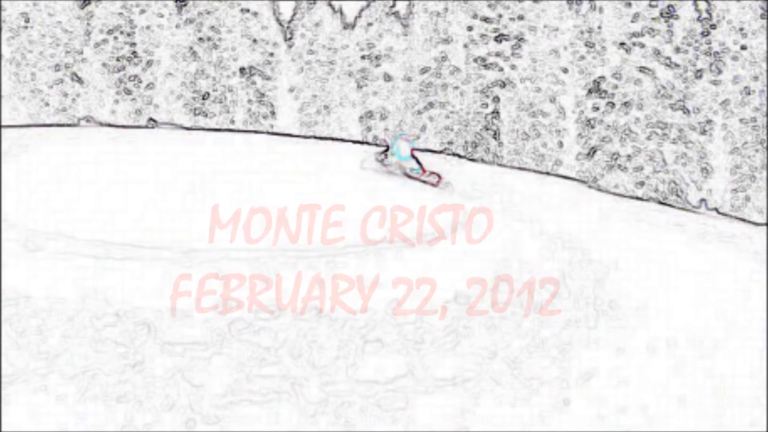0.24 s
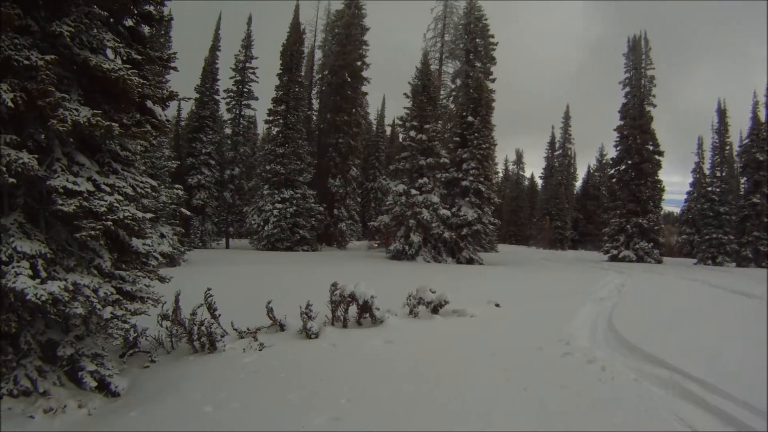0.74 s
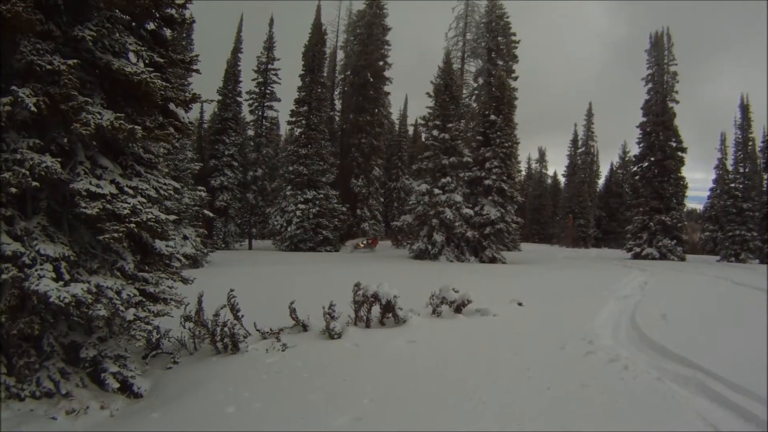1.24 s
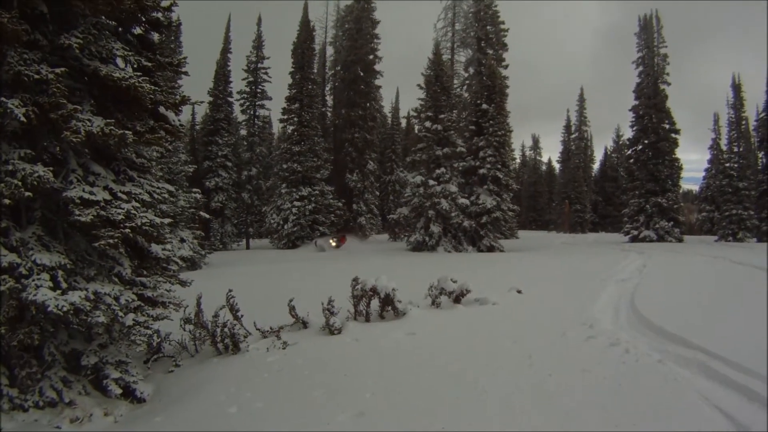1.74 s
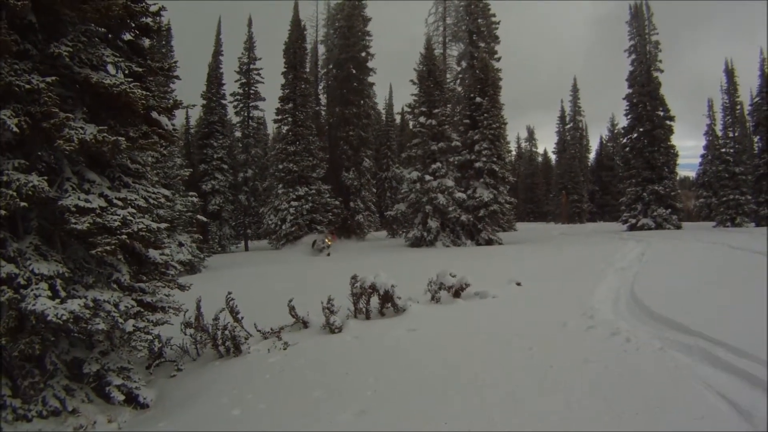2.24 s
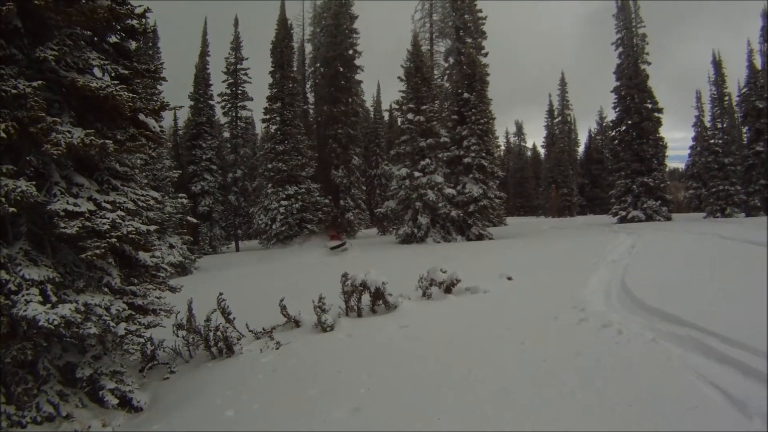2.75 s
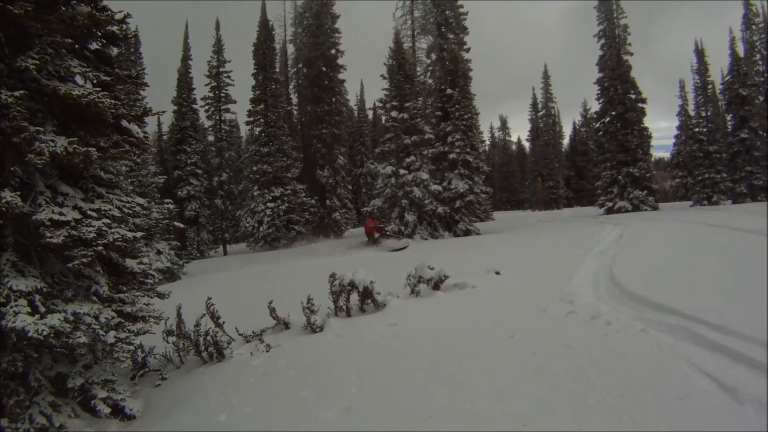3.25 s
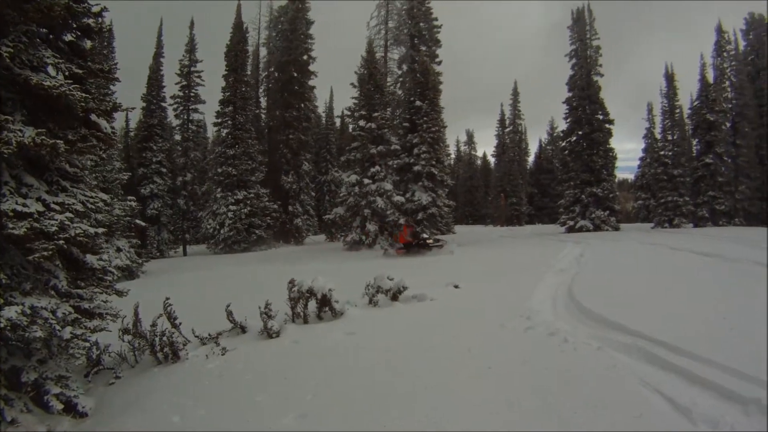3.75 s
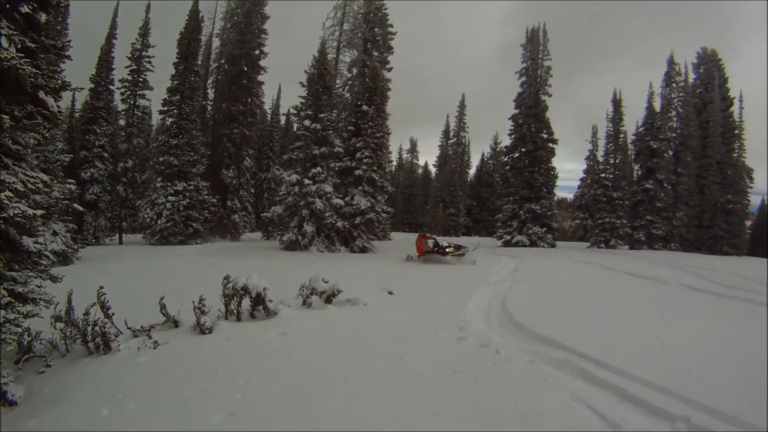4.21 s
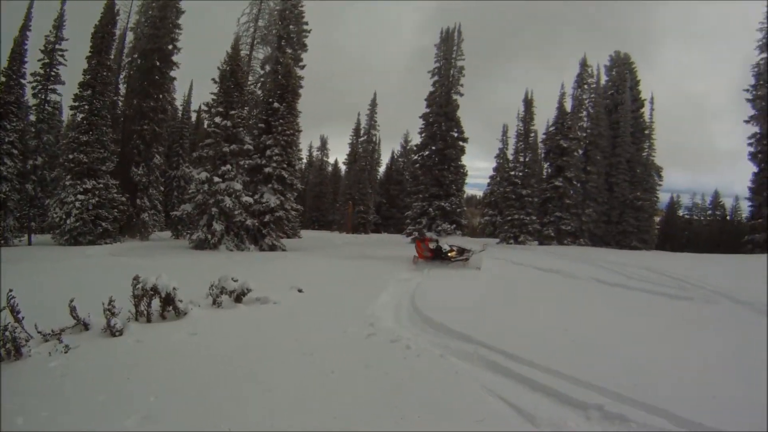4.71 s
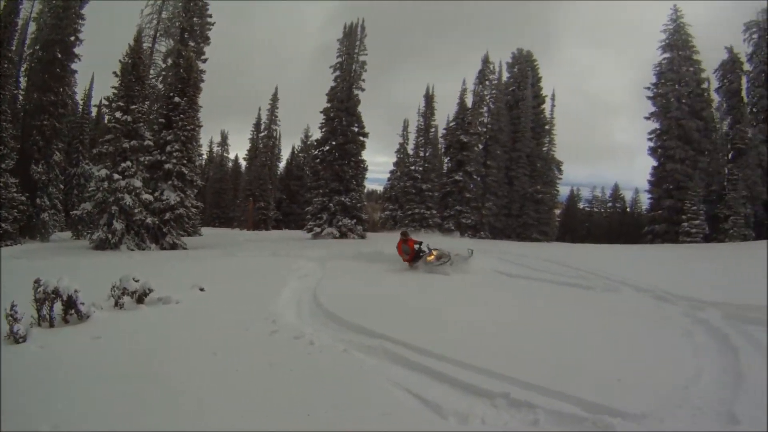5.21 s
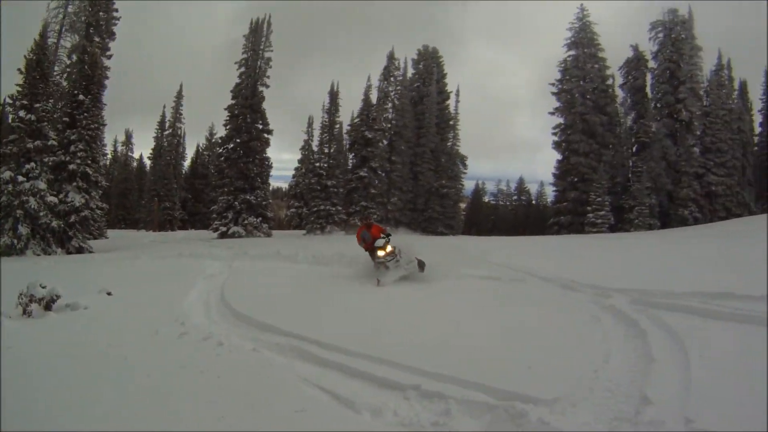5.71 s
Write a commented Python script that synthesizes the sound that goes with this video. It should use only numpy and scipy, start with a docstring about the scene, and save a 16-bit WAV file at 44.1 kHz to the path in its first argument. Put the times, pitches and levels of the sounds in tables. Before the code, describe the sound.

Half a second of silence, then sound cuts in abruptly: a two-stroke snowmobile, muffled and wavering behind trees across a snowy clearing. Its nasal buzz and airy roar build, drop sharply in pitch and level around three seconds, then rev back up as it emerges, with clearer howls, growl and a faint track hum. A small camera microphone in a closed housing gives a boxy, coloured tone over faint hiss.

```python
"""Snowmobile leaving the trees

A twin-cylinder two-stroke snowmobile nears a microphone in a closed housing, whose colour the spectra carry.
Sinusoids at multiples of the crank rate ring over filtered noise for exhaust roar and air rush.
The throttle closes once and opens again as the machine comes out from behind the trees.
Track hum, low rumble, preamp hiss and a thin electrical whine lie beneath; all cuts in after a silence."""
import sys
import numpy as np
from scipy import signal
from scipy.fft import rfft, irfft, next_fast_len
from scipy.io import wavfile
from scipy.ndimage import uniform_filter1d, map_coordinates

SR = 44100
rng = np.random.default_rng(int(sys.argv[2]) if len(sys.argv) > 2 else 0)


def pcm_store(signal):
    """Save signal as 16-bit PCM."""
    levels = np.round(np.clip(np.atleast_2d(signal), -1, 1) * 32767)
    wavfile.write(sys.argv[1], SR, levels.astype(np.int16).T)


N = 263277
TIME_S = np.arange(N) / SR


def amp(db):
    """Decibel law: 20 dB is a factor of ten in amplitude."""
    return 10 ** (np.asarray(db) / 20)


def unit(x):
    """Power normalisation: scale to rms 1."""
    return x / np.sqrt(np.mean(x ** 2) + 1e-20)


def along(points, hz):
    """Spectral envelope: interpolate dB over log frequency, at -120 dB outside the points."""
    point_hz, point_db = np.transpose(points)
    return np.interp(np.log(hz + 1), np.log(point_hz + 1), point_db, left=-120, right=-120)


def curves(rows):
    """Time envelope: one value per sample for each column after the time."""
    times, *columns = np.transpose(rows)
    return [np.interp(TIME_S, times, column) for column in columns]


def wobble(knots_per_s):
    """Random modulation: straight lines between Gaussian knots."""
    knots = rng.standard_normal(1000)
    return map_coordinates(knots, [TIME_S * knots_per_s], order=1)


def in_the_open(pair):
    """Screening: pass from the value behind the trees to the value in the open."""
    return np.interp(TIME_S, (3.35, 3.6), pair)  # s


def filtered(x, response):
    """Linear filtering: multiply the spectrum by a response of frequency."""
    size = next_fast_len(N + SR // 2)
    spectrum = rfft(x, size) * response(np.fft.rfftfreq(size, 1 / SR))
    return irfft(spectrum, size)[..., :N]


def noise(spectrum, patchy_db, gate=1):
    """Modulated noise: gated, given patches of random gain in time and frequency, coloured, rms 1."""
    bins = signal.stft(rng.standard_normal(N) * gate, nperseg=512)[2]
    field = uniform_filter1d(rng.standard_normal(bins.shape), size=5, axis=0)
    field = uniform_filter1d(field, size=16, axis=1)
    patched = signal.istft(bins * amp(patchy_db * unit(field)), nperseg=512)[1][:N]
    return unit(filtered(patched, lambda hz: amp(along(spectrum, hz))))


def turning(rate_hz):
    """Phase integration: the angle [rad] reached by a rotation at the given rate."""
    return 2 * np.pi * np.cumsum(rate_hz) / SR


def partial(k, angle, fade_db, drift):
    """Harmonic of a rotation, nominal rms 1; scattering by the trees fades and drifts high orders faster."""
    spread = .06 * k * k  # rad; higher orders of each puff arrive later
    waver = drift * wobble(7) + .012 * k * wobble(60)  # rad
    gain = np.sqrt(2) * amp(fade_db * wobble(5 + .15 * k))
    return gain * np.cos(k * angle - spread + waver)


def orders(crank_hz, angle, count, colour, odd_db, fade_db, drift):
    """Source-filter principle: crank orders move under a fixed colour; odd ones have their own strength."""
    total, power = np.zeros(N), np.zeros(N)
    for k in count:
        gain = amp(along(colour, k * crank_hz) + (k % 2) * odd_db)
        power += gain ** 2
        total += gain * partial(k, angle, fade_db, drift)
    return total / np.sqrt(power + 1e-12)


# Colour of the preamp hiss: (frequency [Hz], relative density [dB])
HISS_COLOUR = [(25, -32), (150, -14.5), (400, 2), (3000, 3), (8000, -2.5), (9200, -2.5), (12000, -5),
               (15500, -4.5)]


def preamp_hiss():
    """Electronic noise: a steady random signal with a broad colour."""
    return amp(-60.5) * noise(HISS_COLOUR, patchy_db=.2)


# Tones of the electrical whine, from the lowest up: level [dB rms]
WHINE_LEVELS = [-82, -69, -67, -76, -79, -82, -84, -86, -84, -83, -84, -86, -85, -87, -87, -90, -90]
LOWEST_HZ, SPACING_HZ = 7777.05, 60.05


def electrical_whine():
    """Comb spectrum: phases quadratic in tone number make it sweep rather than pulse in each period."""
    whine = np.zeros(N)
    for k, db in enumerate(WHINE_LEVELS):
        phase = 2 * np.pi * (LOWEST_HZ + k * SPACING_HZ) * TIME_S + np.pi / 3 * k * k
        whine += np.sqrt(2) * amp(db) * np.sin(phase)
    return whine


# Colour of the low rumble: (frequency [Hz], relative density [dB])
RUMBLE_COLOUR = [(25, -13), (60, -17), (100, -4), (140, -4), (200, -0.5), (330, -2), (420, -25)]
RUMBLE_START_DB, NEARING_DB_PER_S = -91.5, 3


def rumble(angle):
    """Level rise on approach: unsteady low noise, with a tone at 0.97 of the crank rate."""
    level_db = RUMBLE_START_DB + NEARING_DB_PER_S * TIME_S
    tone = amp(level_db - 7) * partial(0.97, angle, fade_db=0.5, drift=0.53)
    return tone + amp(level_db + 4.3 * wobble(7.5)) * noise(RUMBLE_COLOUR, patchy_db=2.0)


# Lugs of the rubber track passing the drive wheel: (time [s], rate [Hz], level [dB])
TRACK_LUGS = [(3.7, 203, -88), (3.9, 208, -80), (4.27, 219, -76), (4.6, 219, -76), (5.05, 227, -73),
              (5.22, 219, -73), (5.36, 212, -73), (5.6, 214, -71), (5.77, 210, -72), (5.97, 187, -71)]


def track():
    """Periodic impact tone: lug rate and its octave hum, fading in once the machine is in the open."""
    lug_hz, lug_db = curves(TRACK_LUGS)
    angle = turning(lug_hz)
    fade_in = np.clip((TIME_S - TRACK_LUGS[0][0]) / 0.22, 0, 1)  # 0.22 s long
    octave = amp(-8) * partial(2, angle, fade_db=4, drift=.6)
    return fade_in * amp(lug_db) * (partial(1, angle, fade_db=1.5, drift=.6) + octave)


# Colours of the air noises, low to high: (frequency [Hz], relative density [dB])
ROAR_COLOUR = [(150, -58), (220, -27), (330, -35), (600, -17), (1000, -12.5), (1400, -6), (1680, 0.5),
               (1950, 1), (2150, -12.5), (2500, -4.5), (2750, -6.5), (2900, -17.5), (3100, -36)]
RUSH_COLOUR = [(2850, -23), (3000, 1.5), (3180, -11.5), (3400, -2.5), (3800, -1), (4200, -0.5), (4700, -2),
               (5300, -1), (6300, -4.5), (7000, -9), (8000, -18), (9000, -70)]
FIZZ_COLOUR = [(7000, -37), (8000, -9.5), (9000, -6.5), (10500, -11), (12000, -19), (14000, -25)]
FIZZ_RE_RUSH_DB = (-23.5, -17.5)  # behind the trees, in the open


def turbulent_air(roar_db, rush_db, angle):
    """Turbulence noise: roar and rush throb with each firing, twice a turn; a steadier fizz lies above."""
    firing = np.cos(2 * angle)
    roar = amp(roar_db) * noise(ROAR_COLOUR, patchy_db=1.2, gate=1 + .3 * firing)
    rush = amp(rush_db) * noise(RUSH_COLOUR, patchy_db=1.5, gate=1 + 0.17 * firing)
    fizz = amp(rush_db + in_the_open(FIZZ_RE_RUSH_DB)) * noise(FIZZ_COLOUR, patchy_db=.4)
    return roar + rush + fizz


# Colour of the clean high orders inside the rush: (frequency [Hz], relative level [dB])
WHISTLE_COLOUR = [(2900, -36), (2980, -26), (3200, -18), (3600, -0.5), (4060, -2), (4400, -9), (5300, 1),
                  (6000, -1), (6800, -20)]
WHISTLE_RE_RUSH_DB = (-8, -1)  # behind the trees, in the open
BLUR_DB = 0.53  # dB lost for each Hz per second of speed change


def whistles(rush_db, crank_hz, angle, glide):
    """Loss of coherence: high crank orders follow the rush but weaken while the speed changes."""
    level_db = rush_db + in_the_open(WHISTLE_RE_RUSH_DB) - BLUR_DB * glide
    return amp(level_db) * orders(crank_hz, angle, count=range(22, 52), colour=WHISTLE_COLOUR,
                                  odd_db=-8, fade_db=4, drift=.9)


# Colour of the upper crank orders: (frequency [Hz], relative level [dB])
UPPER_COLOUR = [(1950, -19), (2030, 3), (2170, -5), (2300, -11), (2450, -1), (2580, -0.5), (2630, -46)]
# Narrow bright band just under the housing's notch: (frequency [Hz], relative level [dB])
BLARE_COLOUR = [(2600, -41), (2650, -3), (2730, 15), (2820, -13), (2900, -45)]
UPPER_RE_ROAR_DB, BLARE_RE_ROAR_DB = (-13.5, -7.5), (-14, -14)  # behind the trees, in the open


def upper_orders(roar_db, crank_hz, angle):
    """Formant emphasis: orders brighten as they cross peaks of two fixed colours."""
    upper = orders(crank_hz, angle, count=range(15, 28), colour=UPPER_COLOUR,
                   odd_db=-4, fade_db=3.5, drift=1.1)
    blare = orders(crank_hz, angle, count=range(19, 30), colour=BLARE_COLOUR,
                   odd_db=-6, fade_db=3, drift=1.1)
    upper_db = roar_db + in_the_open(UPPER_RE_ROAR_DB)
    return amp(upper_db) * upper + amp(roar_db + in_the_open(BLARE_RE_ROAR_DB)) * blare


# Colour of the growling crank orders: (frequency [Hz], relative level [dB])
GROWL_COLOUR = [(300, -18), (400, -16.5), (680, -4), (950, -6), (1200, 0.5), (1350, 4.5), (1500, -6.5),
                (1600, -25)]
GROWL_RE_LOAD_DB, ODD_DB = (-6.5, -5), (-6, 5.5)  # behind the trees, in the open
GROWL_GROWS = 0.19  # extra dB of growl for each dB of roar


def growl(load_db, roar_db, crank_hz, angle):
    """Level-dependent timbre: mostly odd orders, which gain more level than the roar as it grows."""
    level_db = load_db + in_the_open(GROWL_RE_LOAD_DB) + GROWL_GROWS * (roar_db - roar_db.max())
    return amp(level_db) * orders(crank_hz, angle, count=(3, 5, 7, 9, 10, 11), colour=GROWL_COLOUR,
                                  odd_db=in_the_open(ODD_DB), fade_db=3.5, drift=1.0)


# Single orders that howl or whistle as they swell:
# (middle time [s], crank order [multiple of crank rate], length [s], peak level [dB])
ORDER_SWELLS = [(0.99, 12, 0.83, -51.5), (1.68, 12, 0.26, -45.5), (2.2995, 12, 0.93, -50.5),
                (3.76, 12, 0.19, -44), (4.0, 12, .3, -44), (4.4, 12, 0.61, -47.5), (5.04, 12, 0.61, -40),
                (5.54, 12, 0.34, -47), (1.92, 13, 0.34, -47.5), (4.26, 13, 0.28, -46),
                (4.65, 13, 0.47, -43), (5.12, 13, 0.44, -40.5), (5.9, 13, 0.39, -52), (1.1, 14, 0.23, -54),
                (1.42, 14, 0.32, -51.5), (1.88, 14, 0.36, -56), (3.6796, 14, 0.33, -45.5),
                (3.62, 9, .25, -56), (3.62, 12, .15, -48), (0.55, 15, 0.28, -57.5), (4.08, 14, 0.46, -38.5),
                (4.4, 14, 0.15, -47), (4.9, 14, 0.3, -43.5), (5.204, 14, 0.49, -44.5), (5.44, 15, .4, -46),
                (5.893, 14, 0.44, -43.5), (0.77, 20, 0.18, -56), (4.007, 20, 0.58, -49.5),
                (4.35, 20, 0.26, -57), (5.01, 20, 0.68, -52), (5.76, 20, .3, -61), (4.6, 16, 0.25, -70),
                (5.566, 16, 0.22, -68), (1.87, 10, 0.44, -58), (5.45, 10, 0.38, -51), (4.37, 9, .6, -52),
                (5.7, 9, 0.26, -53), (4.6, 11, 0.21, -52), (3.45, 11, .2, -55.5), (3.4, 16, 0.15, -50),
                (3.5, 14, .12, -49), (3.35, 24, 0.24, -52.5), (3.85, 18, .3, -53.5), (1.02, 26, 0.36, -60),
                (.7, 38, .08, -58), (1.05, 38, .3, -61.5), (4.89, 3, 1.15, -68.5), (5.92, 6, 0.23, -50.5),
                (3.25, 6, .4, -61), (5.5, 7, 0.33, -55), (1.21, 16, .6, -57.5), (1.2, 18, .6, -55),
                (4.9, 28, .6, -63), (4.1, 30, .25, -58), (4.65, 30, 1.4, -59.5), (5.65, 30, .3, -53),
                (4.75, 34, 0.79, -56), (4.2, 38, 0.39, -67), (5.19, 38, 0.73, -57)]
HOWL_RE_LOAD_DB = (-17.5, -16.5)  # behind the trees, in the open


def howl(load_db, angle):
    """Resonance: three orders ring in the engine bay all along; single orders swell and sink over them."""
    gains = {k: amp(load_db + in_the_open(HOWL_RE_LOAD_DB)) for k in range(12, 15)}
    for middle_s, k, length_s, peak_db in ORDER_SWELLS:
        hump = np.cos(np.pi * np.clip((TIME_S - middle_s) / length_s, -.5, .5))
        gains[round(k)] = gains.get(round(k), 0) + amp(peak_db) * hump
    return sum(gain * partial(k, angle, fade_db=2.0, drift=.6) for k, gain in gains.items())


# Firing tones of the exhaust, before the echo is added:
# (time [s], 2nd order level [dB], 6th order level [dB], rise from 4th to 6th and 6th to 8th [dB])
EXHAUST_TONES = [(0.5, -85.5, -74, -5), (0.72, -79.5, -62.5, -1), (1.4, -81, -58.5, 2),
                 (1.85, -72, -56.5, 1), (2.11, -71, -46.5, 1.5), (2.45, -68, -45, 4), (2.88, -58, -47.5, 2),
                 (2.99, -62, -60, -3), (3.1, -66, -68, -5), (3.22, -64.5, -67, -2), (3.4, -61.5, -67, -2),
                 (3.56, -64.5, -64.5, -1.5), (3.72, -66, -55, -1.5), (4.0, -67, -57.5, -2.5),
                 (4.45, -64, -52.5, 9), (4.8, -67.5, -62, 5.5), (5.04, -70.5, -57, 9), (5.36, -63, -62, 5),
                 (5.6, -55.5, -57, 7.5), (5.78, -64, -61, -3.5), (5.87, -66, -64, -7.5),
                 (5.97, -66, -61, -4)]
SOUND_M_S, MACHINE_M_S = 343, 5.1
ECHO_DB, ECHO_ENDS_S, ECHO_FADES_DB_PER_S = -4, 1.778, 78  # the fade starts at ECHO_ENDS_S


def exhaust(crank_hz, angle):
    """Doppler beating: two firings a turn give even orders, which beat with a lower echo off the trees."""
    second_db, sixth_db, rise_db = curves(EXHAUST_TONES)
    # the machine leaves the reflecting trees behind
    echo_angle = turning(crank_hz * (SOUND_M_S - MACHINE_M_S) / (SOUND_M_S + MACHINE_M_S))
    echo_db = ECHO_DB - ECHO_FADES_DB_PER_S * np.maximum(TIME_S - ECHO_ENDS_S, 0)
    levels_db = {2: second_db, 4: sixth_db - rise_db, 6: sixth_db, 8: sixth_db + rise_db}
    tones = np.zeros(N)
    for k, db in levels_db.items():
        direct = partial(k, angle, fade_db=1.5, drift=0.87)
        echo = amp(echo_db) * partial(k, echo_angle, fade_db=7.5, drift=0.47)
        tones += amp(db) * (direct + echo)
    return tones


# Crank speed: (time [s], turns per second [Hz])
CRANK_SPEED = [(0.5, 123.5), (0.64, 135.2), (0.74, 139.1), (1.18, 136.8), (1.49, 138.1), (1.99, 133.6),
               (2.39, 140.4), (2.54, 138.1), (2.89, 128.5), (2.94, 124.2), (3.2, 95.6), (3.27, 97.9),
               (3.41, 109.7), (3.48, 117.8), (3.61, 129.7), (3.7, 135.9), (3.81, 137.2), (4.58, 134.8),
               (4.63, 135.6), (4.78, 134.9), (5.04, 135.8), (5.34, 131.7), (5.6, 134.9), (5.71, 134.7),
               (5.76, 133.1), (5.88, 124.1), (5.97, 124.8)]
# Turbulent air: (time [s], roar level [dB], rush level [dB])
AIR_LEVELS = [(0.5, -55, -70), (0.7, -50.5, -59), (0.97, -48, -54.5), (1.28, -47, -53),
              (1.44, -45.5, -48.5), (1.61, -45, -52.5), (1.7, -42.5, -49.5), (1.79, -45, -49.5),
              (1.84, -43.5, -46.5), (2.15, -39.5, -45.5), (2.42, -38.5, -45), (2.68, -41.5, -42),
              (2.77, -40.5, -40.5), (2.88, -44, -46), (2.98, -52, -61.5), (3.2, -53.5, -63),
              (3.32, -47.5, -57.5), (3.44, -44, -57), (3.55, -47.5, -55), (3.6, -44.5, -53.5),
              (3.74, -46, -51), (4.14, -44.5, -50.5), (4.44, -44, -50.5), (4.85, -43.5, -48.5),
              (5.15, -43, -45.5), (5.33, -42.5, -47.5), (5.71, -42.5, -50.5), (5.86, -44, -49.5),
              (5.97, -44.5, -54.5)]
FULL_HZ, SLACK_DB_PER_HZ = 130.2, 0.33  # below full speed, howl and growl sink under the roar


def engine():
    """Order locking: one crank angle drives the tones and the firing pulses of the air noise."""
    crank_hz, = curves(CRANK_SPEED)
    # speed change [Hz/s]; while the speed changes, the high orders blur
    glide = uniform_filter1d(abs(np.gradient(crank_hz)) * SR, size=4000)
    angle = turning(crank_hz + (.3 + .007 * glide) * wobble(40))
    roar_db, rush_db = curves(AIR_LEVELS)
    load_db = roar_db - SLACK_DB_PER_HZ * np.maximum(FULL_HZ - crank_hz, 0)
    sound = rumble(angle) + turbulent_air(roar_db, rush_db, angle)
    sound += whistles(rush_db, crank_hz, angle, glide)
    sound += upper_orders(roar_db, crank_hz, angle)
    sound += growl(load_db, roar_db, crank_hz, angle)
    return sound + howl(load_db, angle) + exhaust(crank_hz, angle)


def scene():
    """Superposition: all sources add at one microphone, which feeds both channels."""
    mono = preamp_hiss() + electrical_whine() + track() + engine()
    return np.tile(mono, (2, 1))


def record(dry):
    """Band limiting: the sound cuts in quickly, and nothing is kept above the limit."""
    start_s, rise_db_per_s, top_hz = 0.484, 1300, 15300
    fade = amp(np.minimum(rise_db_per_s * (TIME_S - start_s), 0))
    return filtered(dry * fade, lambda hz: hz < top_hz)


dry = scene()
out = record(dry)
pcm_store(out)
```